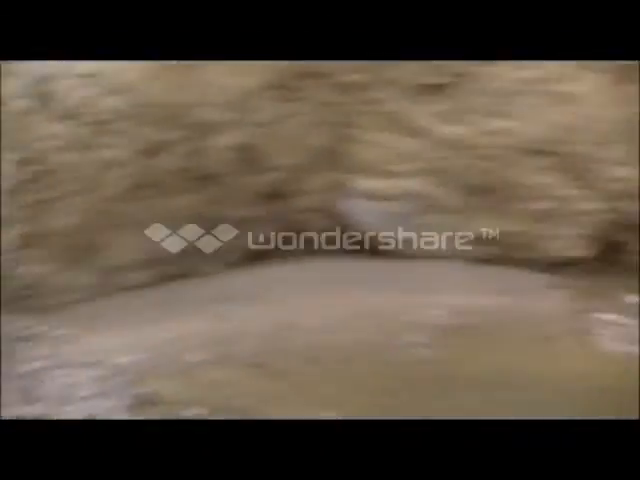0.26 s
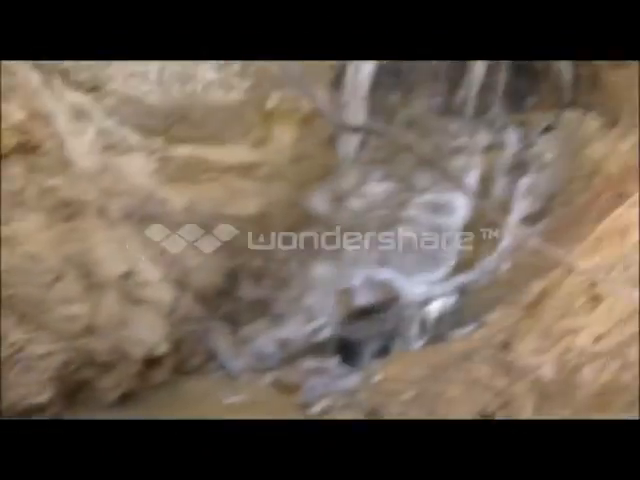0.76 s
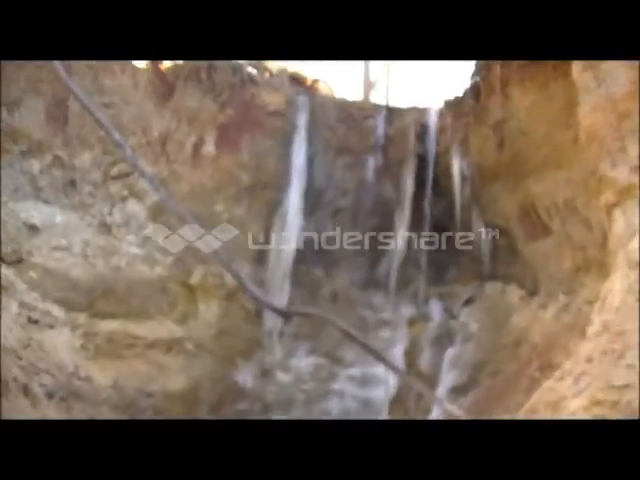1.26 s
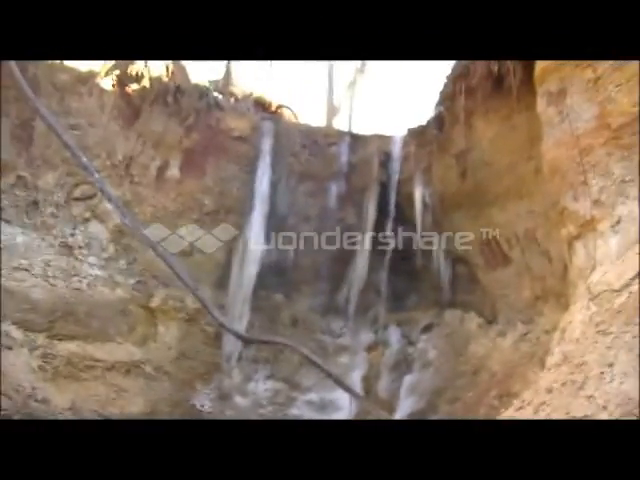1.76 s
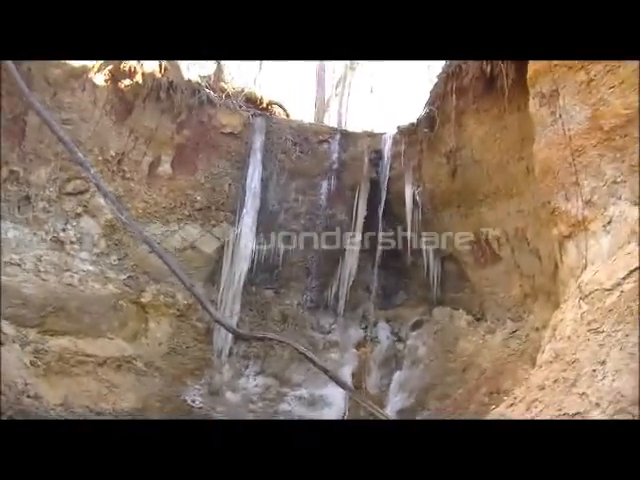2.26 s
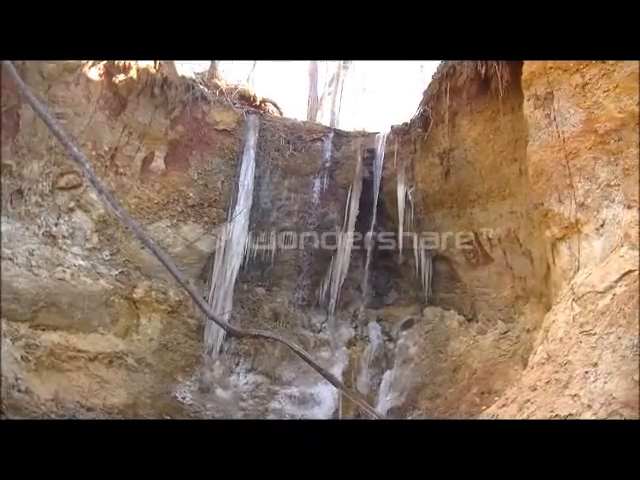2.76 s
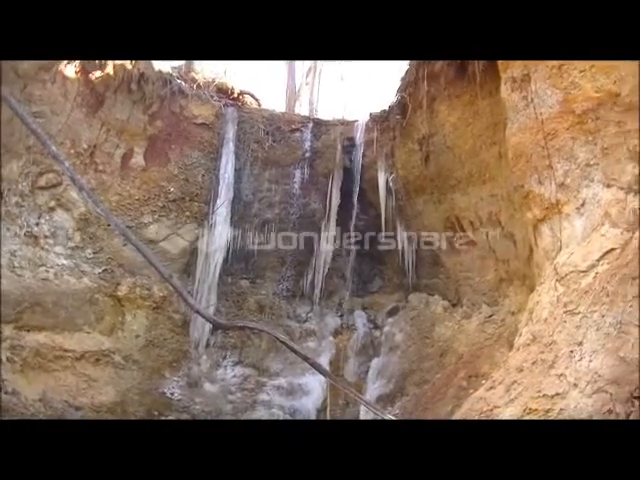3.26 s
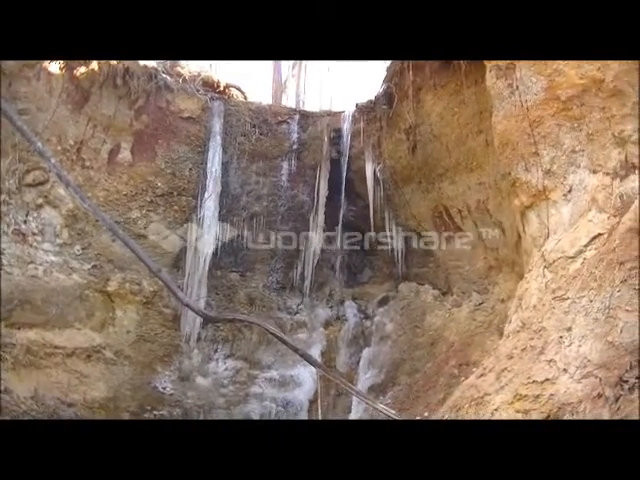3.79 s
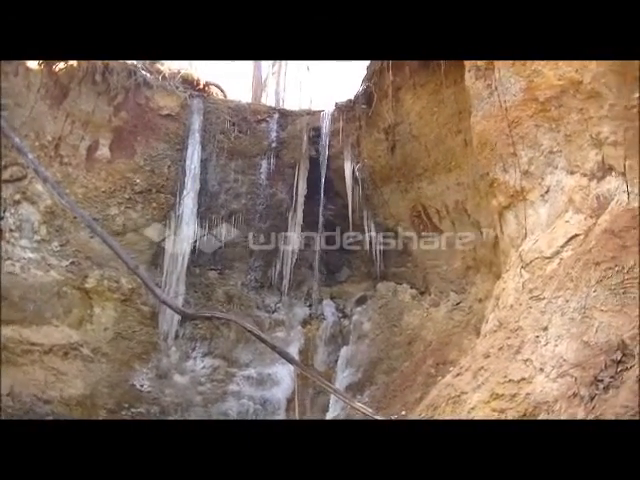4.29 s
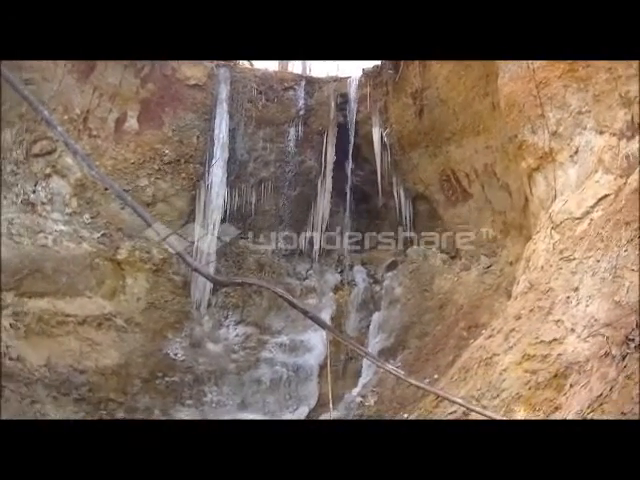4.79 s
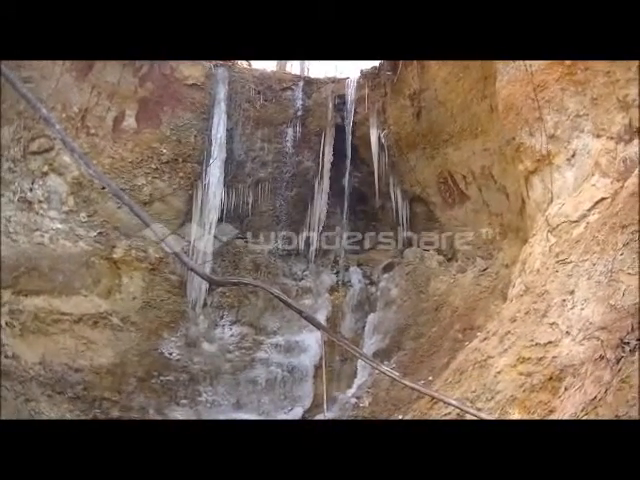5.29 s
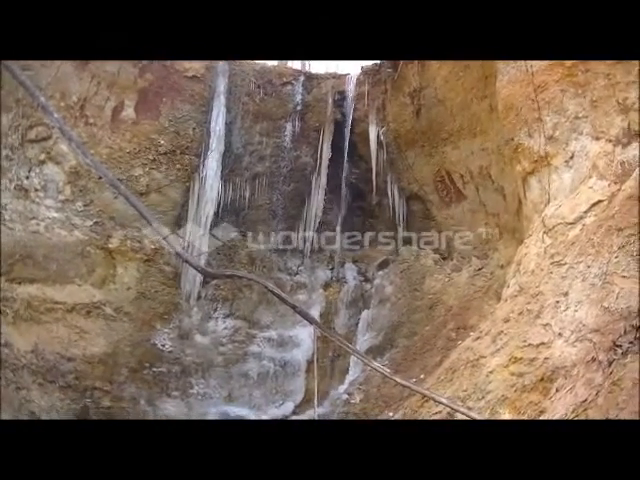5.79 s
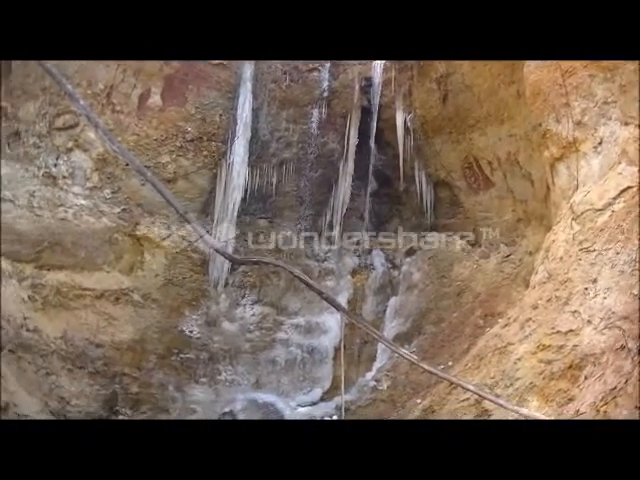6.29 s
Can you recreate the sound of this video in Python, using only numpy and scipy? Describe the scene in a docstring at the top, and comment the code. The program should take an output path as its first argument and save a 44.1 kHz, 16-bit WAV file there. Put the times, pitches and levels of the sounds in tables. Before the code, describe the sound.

A small, partly frozen waterfall spatters continuously onto wet stone in a rock hollow. Bright patter and hissing spray dominate, with clear trickling bubbles and a softer burbling pool below. The microphone swings to face the fall in the first half second and the water grows brighter and louder, then stays even. Irregular gushes and slaps punctuate it, busiest just before two seconds, with a sharp smack near the end. Faint low air puffs at the start.

```python
"""A thin waterfall drops past icicles into a hollow of rock: uneven gushes of drops patter on wet stone.
Patter and fine spray are short rings, bubbles and noise; the churning pool is low bubbles, noise and rumble.
Larger lumps slap down as a damped ring, a crack and scattered droplets; rivulets and gurgles are runs of
bubbles, and trapped air gulps and plops at low pitch. Faint noise puffs are air brushing the microphone.
It turns from side-on to face the fall: the left lag vanishes and its level loss shrinks to a slight one."""
import sys
import numpy as np
from scipy import signal
from scipy.fft import rfft, irfft
from scipy.io import wavfile
from scipy.ndimage import map_coordinates

SR = 44100
rng = np.random.default_rng(int(sys.argv[2]) if len(sys.argv) > 2 else 0)


def wrap_up_sound(samples):
    """Save the sound to the file named by the first command line argument, as 16-bit audio."""
    columns = np.atleast_2d(samples).T
    # keep every value between -1 and 1, then stretch to whole-number steps
    tamed = np.clip(columns, -1, 1)
    steps = np.round(tamed * 32767).astype(np.int16)
    wavfile.write(sys.argv[1], SR, steps)


N = 288656  # samples
TIME = np.arange(N) / SR  # s


def gain_of(db):
    """Decibels to amplitude."""
    return 10 ** (np.asarray(db) / 20)


def evened(x):
    """Scales a mid-side pair so that the mid has rms 1."""
    return x / np.sqrt(np.mean(x[0] ** 2) + 1e-20)


def level(table, axis=1):
    """One dB column of a curve as a gain for every sample."""
    columns = np.transpose(table)
    return gain_of(np.interp(TIME, columns[0], columns[axis]))


def add(mix, s, sound):
    """Mixes a sound in at time s."""
    part = mix[..., max(round(s * SR), 0):][..., :sound.shape[-1]]
    part += sound[..., :part.shape[-1]]


def coloured(x, points):
    """Causal minimum-phase filter whose gain follows (f/Hz, level/dB) points."""
    hz, db = np.transpose(points)
    bins_hz = abs(np.fft.fftfreq(4096, 1 / SR))
    curve_db = np.interp(np.log(bins_hz + 1), np.log(hz + 1), db)
    log_gain = curve_db * np.log(10) / 20
    # the Hilbert transform of the log gain supplies the minimum phase
    taps = np.fft.ifft(np.exp(np.conj(signal.hilbert(log_gain)))).real[:2048]
    taps = taps.reshape((1,) * (x.ndim - 1) + (-1,))
    return signal.oaconvolve(x, taps, axes=-1)[..., :x.shape[-1]]


def drift(rate_hz):
    """Smooth chance of rms 1, changing at up to about the given rate."""
    hz = np.fft.rfftfreq(8192, 1 / 1000)  # drawn at 1000 points a second
    band = hz / (hz + rate_hz / 3) / (1 + (hz / rate_hz) ** 2)
    slow = irfft(rfft(rng.standard_normal(8192)) * band)
    return np.interp(TIME, np.arange(len(slow)) / 1000, slow / slow.std())


def ring(hz, cycles, rise=0):
    """A damped oscillation, 27 dB down after the given cycles; rise lifts its pitch like a surfacing bubble."""
    u = np.arange(int(2 * cycles * SR / hz) + 4) * hz / SR / cycles
    wave = np.sin(2 * np.pi * cycles * (u + rise * u * u / 2))
    onset = 1 - np.exp(-2 * np.pi * cycles * u)
    return wave * np.exp(-np.pi * u) * onset


def grains(low_hz, high_hz, per_s, cycles, spread_db, rise, clump, count=28):
    """A shower of short rings on a ladder of pitches, of random time, size and direction, as mid and side."""
    out = np.zeros((2, N))
    for hz in np.geomspace(low_hz, min(high_hz, SR / 2), count):
        stream = np.random.default_rng(rng.integers(2 ** 31))
        when, size, side, sign = stream.random((int(per_s * N / SR / count) + 1, 4)).T
        at = (when * N).astype(int)
        gain = gain_of(spread_db * -np.log(size + np.exp(-4)))  # many small, few large
        gain = gain * np.sign(sign - .5) * clump[at]
        pan = (2 * side - 1) * np.sqrt(3)
        hits = np.array([np.bincount(at, gain, N), np.bincount(at, gain * pan, N)])
        shape = ring(hz, cycles, rise)
        shape = shape[None] * np.sqrt(hz) / np.linalg.norm(shape)
        out += signal.oaconvolve(hits, shape, axes=1)[:, :N]
    return evened(out)


def bubbles(low_hz, high_hz, per_s, cycles, spread_db, rise, clump):
    """Separate bubbles, each ringing at a pitch and for a life of its own, as mid and side."""
    out = np.zeros((2, N))
    for when, pitch, size, side, life in rng.random((int(per_s * N / SR), 5)):
        hz = low_hz * (high_hz / low_hz) ** pitch
        gain = gain_of(-spread_db * np.log(size + np.exp(-4)))  # many small, few large
        gain = gain * clump[int(when * N)] * hz / low_hz
        pan = (2 * side - 1) * np.sqrt(3)
        bubble = ring(hz, cycles * (.5 + life), rise)
        add(out, when * N / SR, gain * np.outer([1, pan], bubble))
    return evened(out)


def wash(swell):
    """Countless tiny impacts merged into noise."""
    return evened(rng.standard_normal((2, N)) * swell)


def hollow(x, t60, wet_db):
    """The rock walls scatter each impact into a short tail of sparse echoes."""
    t = np.arange(SR // 4) / SR
    echoes = rng.standard_normal((2, len(t))) * (rng.random((2, len(t))) < 2500 / SR)  # 2500 per s
    tail = echoes * gain_of(-60 * t / t60) * (t > .002)
    tail /= np.linalg.norm(tail, axis=1, keepdims=True)
    return evened(x + gain_of(wet_db) * signal.oaconvolve(x[:1], tail, axes=1)[:, :N])


# Air brushing the microphone, strongest near the start. Columns: t/s, level/dB
BUFFET = [(0, -65), (.28, -55.5), (.5, -79), (.9, -72), (1.75, -69), (2.2, -90), (2.65, -78), (3.1, -79),
          (3.65, -73), (4.8, -72), (5.45, -70), (5.68, -88), (5.9, -72), (6.1, -84), (6.35, -69),
          (6.55, -71)]
# Tone of the puffs. Columns: f/Hz, level/dB
BUFFET_COLOUR = [(10, -8), (30, -2), (60, 7), (110, 2), (250, -33)]
PUFF_DB, PUFF_HZ = 3.5, 8  # rms unevenness (dB) and rate (Hz) of the puffs


def buffet():
    """Faint lumpy puffs of air on the microphone: low noise with a drifting swell."""
    puffs = wash(gain_of(PUFF_DB * drift(rate_hz=PUFF_HZ)))
    return level(BUFFET) * evened(coloured(puffs, BUFFET_COLOUR))


def spurting(per_s, decay_s):
    """Lumps of the broken stream land abruptly and die away: lopsided chance of rms 1."""
    chance, size = rng.random((2, N))
    landings = (chance < per_s / SR) * (2.0 + size)
    lumps = signal.lfilter([1], [1, -np.exp(-1 / (decay_s * SR))], landings)
    return (lumps - lumps.mean()) / (lumps.std() + 1e-9)


# Gushes of the stream, before the lull and sway are added.
# Columns: t/s at the crest, half length/s, surge level/dB on the rock, in the spray, in the pool
GUSHES = [(0.016, 0.058, 7, 3, 11.5), (0.194, 0.034, 4.5, 3, 3), (0.605, 0.024, -0.5, 1, -2),
          (0.745, 0.021, 0.5, 5.5, 3), (0.828, 0.018, 2.5, 1, 0), (0.966, .025, 3, 3.5, 3),
          (1.086, 0.022, 3, 2, 5), (1.558, 0.028, 4.5, 3, 4), (1.66, .04, 1.5, 1.5, 5),
          (1.73, .044, 6, 5.5, 15.5), (1.855, .06, 1.5, 3, 6), (2.088, 0.023, 2, -1, 3),
          (2.266, 0.028, 5, 4, 2), (2.345, 0.027, 3, 4, 2), (2.537, 0.045, 2.5, 1, 1.5),
          (2.688, 0.028, 0.5, 3.5, 7), (2.9, 0.023, 1, 2, -2), (3.03, 0.045, 1.5, 2.5, 6),
          (3.67, 0.04, 0, 0.5, -1), (3.923, 0.029, 3.5, 3, -1), (3.81, 0.027, 1.5, 3, 6),
          (4.03, 0.03, 5.5, 6, 3), (4.19, 0.041, 4.5, 3.5, 2), (4.362, 0.023, 3, 4, 2),
          (4.732, 0.029, 2.5, 1, 7), (4.85, 0.019, 5.5, 2.5, -1), (4.987, 0.037, 4, 2, 11),
          (5.118, 0.073, 3, 3, 6), (5.4, 0.084, 2, 0.5, 11.5), (5.555, 0.035, 3, 1, 3),
          (5.695, 0.09, 1, -1, 5.5), (6.006, .016, 2.5, 3, 4), (6.118, 0.036, 2.5, 2, -5),
          (6.253, 0.025, 2.5, 2.5, 2), (6.5, 0.027, 4, 5, 1)]
LULL_SHARE, LULL_LENGTH = 0.32, 2.77  # depth as a share of the surge, length as a multiple of the gush
SWAY_DB, SWAY_HZ = .8, 9  # lesser chance surges: rms size (dB), rate (Hz)


def gushing():
    """Water is held back around each crest, deepest just before it: surge in dB on rock, in spray, in pool."""
    surge = np.zeros((3, N))
    for s, half_s, rock_db, spray_db, pool_db in GUSHES:
        u = (TIME - s) / half_s
        lull = LULL_SHARE * np.exp(-((u + 1) / LULL_LENGTH) ** 2)
        surge += np.outer([rock_db, spray_db, pool_db], np.exp(-u ** 2) - lull)
    return surge + SWAY_DB * drift(rate_hz=SWAY_HZ)


# Base flow before the gushes, loudest as the microphone comes to face the fall.
# Columns: t/s, patter level/dB, fine spray level/dB, pool level/dB
FLOW = [(0.0, -39, -40, -50), (0.35, -36.5, -36, -46.5), (0.58, -35, -35, -43), (0.95, -36, -36.5, -46.5),
        (2.15, -36.5, -36.5, -46.5), (3.5, -37, -36.5, -49.5), (6.55, -37, -36.5, -49.5)]


def base_flow(axis):
    """The slow level of one layer: 1 patter, 2 spray, 3 pool."""
    return level(FLOW, axis)


# Tone of the churning water. Columns: f/Hz, level/dB
POOL_COLOUR = [(60, -28), (150, -10.5), (250, -2), (280, -6), (363, 3), (429, -3.5), (476, 2.5),
               (516, -1.5), (653, 3), (700, -2), (1100, -3), (1430, -46), (2420, -120)]
# Tone of the rumble beneath. Columns: f/Hz, level/dB
RUMBLE_COLOUR = [(15, -45), (40, -40), (86, -23), (105, -17), (145, 0), (250, -3), (320, -55), (550, -120)]
RUMBLE_DB = -58.5  # rms before the shared bass loss


def pool(spurts, surge):
    """Bubbles burble where the water runs into the pool, over its low rumble."""
    clump = gain_of(0.085 * spurts + 0.18 * drift(rate_hz=14))
    plips = bubbles(low_hz=225, high_hz=1325, per_s=300, cycles=18, spread_db=1.2, rise=0.05, clump=clump)
    churn = plips + gain_of(7.5) * wash(clump)
    burble = base_flow(axis=3) * gain_of(surge) * evened(coloured(churn, POOL_COLOUR))
    rumble = gain_of(RUMBLE_DB) * evened(coloured(wash(1), RUMBLE_COLOUR))
    return burble + rumble


# Large air pockets gulping in the pool, before filtering. Columns: t/s, ring level/dB, starting pitch f/Hz
GULPS = [(0.731, -34, 143), (1.072, -37, 150), (1.116, -33, 171), (1.726, -27, 390), (1.731, -27, 720),
         (1.737, -25, 320), (1.742, -26, 560), (1.834, -34, 370), (2.36, -31, 590), (3.561, -36, 151),
         (3.802, -33, 590), (4.225, -35, 154), (4.73, -34, 145), (5.458, -37, 172), (5.532, -39, 167)]
PLOP_AT, PLOP_DB = 1.3632, -19  # one hollow plop: s, dB before its mode levels and filtering
# Modes of the plop's cavity. Columns: f/Hz, level/dB re the plop, t60/s
PLOP_MODES = [(520, -4, .022), (870, 0, .008)]


def air_pockets(cycles, rise):
    """Trapped air gulps low in the pool; one cavity shuts with a short hollow plop."""
    gulps, plop = np.zeros((2, N)), np.zeros((2, N))
    t = np.arange(SR // 10) / SR
    for s, db, hz in GULPS:
        add(gulps[0], s, gain_of(db) * ring(hz, cycles, rise))
    for hz, db, t60 in PLOP_MODES:
        fade = gain_of(PLOP_DB + db - 60 * t / t60)
        add(plop[0], PLOP_AT, -fade * np.sin(2 * np.pi * hz * t))
    # small pockets radiate little far below their own pitch
    return coloured(gulps, [(40, -25), (125, 0)]) + coloured(plop, [(100, -25), (420, 0)])


# Tone of the spray. Columns: f/Hz, level/dB
SPRAY_COLOUR = [(3820, -19), (6500, -0.5), (10600, 1.5), (12200, 1), (14100, -2), (14900, -9.5), (15400, 0)]


def spray(spurts):
    """The finest droplets and bursting bubbles fizz above the patter."""
    clump = gain_of(.5 * spurts)
    droplets = grains(low_hz=6240, high_hz=16100, per_s=5500, cycles=1.7, spread_db=3, rise=0, clump=clump)
    fizz = bubbles(low_hz=6000, high_hz=15000, per_s=500, cycles=130, spread_db=1.6, rise=.008, clump=clump)
    mist = droplets + gain_of(-4) * fizz + gain_of(2.5) * wash(clump)
    return base_flow(axis=2) * evened(coloured(mist, SPRAY_COLOUR))


# Flurries of bubbles where a gush drags air under, before the shared bass loss.
# Columns: t/s at the middle, peak level/dB, central pitch f/Hz, half length/s
GURGLES = [(0.232, -21.5, 4400, .03), (1.728, -26.5, 5800, .035), (1.738, -26, 2400, .05),
           (1.953, -29, 2000, .018), (2.56, -31, 1550, .07), (4.33, -30, 1750, .06), (5.0, -30, 1700, .04),
           (5.45, -30, 2000, .024), (0.632, -29.5, 1490, 0.12), (0.813, -31, 1530, .11),
           (1.171, -37.5, 523, 0.088), (2.258, -28.5, 1510, .04), (3.68, -25, 5600, .065)]


def gurgles(cycles, pitch_spread, count=16):
    """A gush sheds a brief flurry of bubbles of similar pitch."""
    out = np.zeros((2, N))
    for s, db, hz, half_s in GURGLES:
        flurry = np.zeros((2, N))
        for early, late, pitch, size, side in rng.random((count, 5)):
            bubble = ring(hz * np.exp(pitch_spread * (2 * pitch - 1)), cycles, rise=0.025)
            bubble = (0.45 + size) * np.outer([1, 2 * side - 1], bubble)
            add(flurry, s + half_s * (late - early), bubble)  # crowded towards the middle
        out += gain_of(db) * flurry / abs(flurry[0]).max()
    return out


# runs per s, pitch range (Hz) before climb and scatter, run length (s), bubbles in each run
TRICKLES_PER_S, TRICKLE_HZ, TRICKLE_S, TRICKLE_BUBBLES = 30, (1700, 5700), .07, 4
TRICKLE_DB, TRICKLE_CYCLES = -3.5, 48  # dB re the patter's base flow before bubble size; ring in cycles
TRICKLE_CLIMB, TRICKLE_SCATTER = .08, .08  # pitch climb over a run, and scatter either way, as shares


def trickles():
    """Rivulets form and fade, each a short run of clear bubbles that tends to climb a little in pitch."""
    out = np.zeros((2, N))
    low_hz, high_hz = TRICKLE_HZ
    for when, pitch, side in rng.random((int(TRICKLES_PER_S * N / SR), 3)):
        run_hz = low_hz * (high_hz / low_hz) ** pitch
        for age, scatter, size in rng.random((TRICKLE_BUBBLES, 3)):
            hz = run_hz * (1 + TRICKLE_CLIMB * (age - .5) + TRICKLE_SCATTER * (2 * scatter - 1))
            gain = np.sqrt(np.sin(np.pi * age)) * (.5 + size) * np.sqrt(hz / low_hz)
            bubble = gain * ring(hz, TRICKLE_CYCLES, rise=.03)
            add(out, when * N / SR + age * TRICKLE_S, np.outer([1, 2 * side - 1], bubble))
    return gain_of(TRICKLE_DB) * base_flow(axis=1) * out


# Lumps of water hitting stone, before filtering.
# Columns: t/s, smack peak level/dB, smack pitch f/Hz, length/cycles, droplet scatter level/dB re smack
SLAPS = [(0.0246, -24, 2200, 2, -17), (0.188, -18, 4450, 10, -14), (0.2234, -14, 4400, 14, -14),
         (0.3938, -13.5, 3100, 3, -18), (0.4037, -20, 2200, 3, -20), (0.5648, -17.5, 3500, 4, -22),
         (1.0287, -18.5, 4300, 5, -22), (1.7222, -19, 2600, 5, -17), (1.7302, -16.5, 5000, 5, -15),
         (1.7415, -18, 1500, 3, -18), (1.752, -18.5, 2200, 2, -22), (1.7715, -23, 2000, 4, -17),
         (1.8165, -21, 1650, 3, -20), (1.842, -21, 3000, 4, -21), (1.856, -11.5, 7200, 2, -22),
         (1.8635, -21, 5000, 6, -14), (1.9124, -16.5, 2200, 1.3, -28), (1.9485, -21, 2090, 6, -17),
         (2.0778, -18.5, 4200, 4, -21), (2.6823, -19.5, 4300, 4, -21), (3.025, -21.5, 1800, 3, -20),
         (3.049, -19, 4290, 5, -14), (3.3946, -19, 5900, 3, -19), (4.0042, -19, 2500, 2, -22),
         (4.0252, -13.5, 4000, 5, -12.5), (4.209, -17, 3550, 5, -14), (4.358, -18, 3500, 3, -16),
         (5.249, -20, 3700, 4, -23), (5.4305, -23, 2500, 5, -21), (5.4480, -19.5, 2100, 10, -26),
         (5.5293, -13.5, 4100, 6.5, -16), (5.9875, -13.5, 4800, 5, -15), (5.9886, -17.5, 2200, 3.5, -25),
         (6.4714, -9.5, 2200, 4.4, -17), (6.4733, -18, 2600, 5, -22), (6.4785, -19, 4350, 26, -19),
         (6.4802, -20, 1900, 8, -20), (6.4895, -21, 2800, 18, -15)]
# Tone of the crack and the droplets. Columns: f/Hz, level/dB
SCATTER_COLOUR = [(200, -22), (900, -11), (1600, 0), (4400, -1), (7000, -11), (12000, -13), (16000, -22)]
CRACK_DB, CRACK_T60 = -10, .008  # starting level (dB re smack peak), t60 (s)


def slaps(scatter_t60):
    """A lump smacks once, its skin tearing with a brief crack, then its droplets land all around."""
    out = np.zeros((2, N))
    t = np.arange(SR // 5) / SR
    for s, db, hz, cycles, scatter_db in SLAPS:
        smack = ring(hz, cycles)
        side = rng.random() - .5
        add(out, s, gain_of(db) * np.outer([1, side], smack / abs(smack).max()))
        crack = evened(coloured(rng.standard_normal((2, len(t))), SCATTER_COLOUR))
        add(out, s, gain_of(db + CRACK_DB - 60 * t / CRACK_T60) * crack)
        droplets = rng.standard_normal((2, len(t))) * gain_of(3.5 * rng.standard_normal(len(t)))
        fade = gain_of(-60 * t / scatter_t60) * np.minimum(t / .004, 1)
        add(out, s, gain_of(db + scatter_db) * fade * evened(coloured(droplets, SCATTER_COLOUR)))
    return coloured(out, [(200, -25), (1100, -4.0)])  # so small a splash radiates little bass


# Tone of the patter. Columns: f/Hz, level/dB
PATTER_COLOUR = [(650, -11.5), (1100, -7), (1660, -3.5), (3530, -6.5), (4220, -3.5), (4830, -6), (5770, -5),
                 (6500, -11), (8450, -21.5), (14300, -120)]


def patter(spurts):
    """Drops smack on wet stone in clumps, and some leave small ringing bubbles."""
    clump = gain_of(.52 * spurts)
    drops = grains(low_hz=930, high_hz=7300, per_s=4400, cycles=1.7, spread_db=3.1, rise=0, clump=clump)
    tinkle = bubbles(low_hz=1100, high_hz=6200, per_s=650, cycles=26, spread_db=2.1, rise=.06, clump=clump)
    water = hollow(drops, t60=.08, wet_db=-9) + gain_of(-7.5) * tinkle + wash(clump)
    return base_flow(axis=1) * evened(coloured(water, PATTER_COLOUR))


# The microphone turns towards the fall. Columns: t/s, angle off to the right/share of a quarter turn
ANGLE = [(0, 1), (.3, 1), (.42, .5), (.55, 0), (6.55, 0)]
# Stereo spread, a filter on the side signal. Columns: f/Hz, level/dB
WIDTH = [(30, 3), (60, -3), (90, -10), (130, -13), (300, -13), (600, -17), (1200, -21), (2600, -21),
         (3500, -11), (5000, -15), (8000, -10), (12000, -11), (15000, -16)]
PORT_LAG_S = 3.6e-5  # lag between the two ports for a sound from the side


def ports(water, walls_db):
    """Two close ports: from the side the fall reaches the left one later, and the walls are heard more."""
    angle = np.interp(TIME, *np.transpose(ANGLE))
    mid, side = water
    side = coloured(side, WIDTH) + gain_of(walls_db) * angle * side
    heard_at = np.arange(N) - angle * PORT_LAG_S * SR
    left = map_coordinates(mid + side, [heard_at], order=5, mode="nearest")
    return np.array([left * gain_of(-.35 - 1.9 * angle), mid - side])


# Small splashes radiate almost no deep bass. Columns: f/Hz, level/dB
BASS_LOSS = [(25, -24), (55, -15), (100, 0.5)]


def scene():
    """All the water in mid and side, with the air puffs, heard through the two ports."""
    spurts = spurting(per_s=100, decay_s=0.011)
    on_rock, in_spray, in_pool = gushing()
    water = pool(spurts, in_pool) + air_pockets(cycles=3.4, rise=0.11)
    water += gain_of(in_spray) * spray(spurts)
    water += gurgles(cycles=11, pitch_spread=.25, count=22)
    water += slaps(scatter_t60=.11)
    water += gain_of(on_rock) * (patter(spurts) + trickles())
    return ports(coloured(water, BASS_LOSS) + buffet(), walls_db=-9)


EDGE_HZ = 15350  # top of the band


def record(dry):
    """A steep low-pass closes the top of the band."""
    taps = signal.firwin(511, EDGE_HZ, window=("kaiser", 9), fs=SR)
    return signal.oaconvolve(dry, taps[None], "same")


dry = scene()
out = record(dry)
wrap_up_sound(out)
```